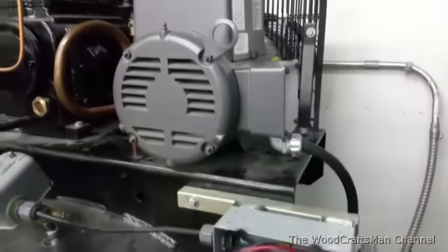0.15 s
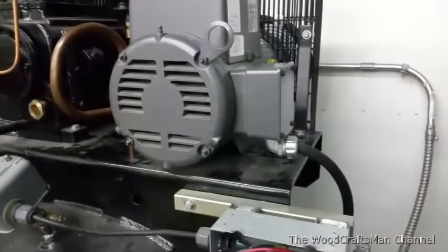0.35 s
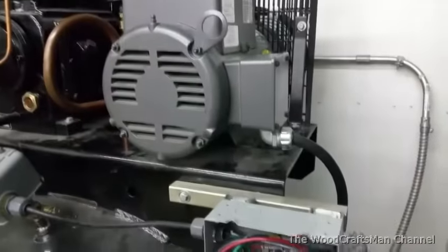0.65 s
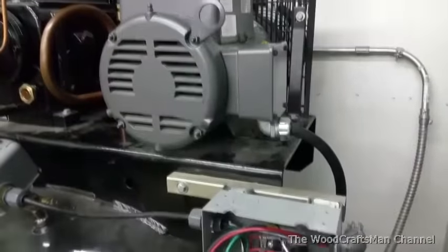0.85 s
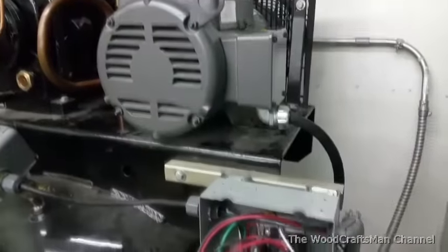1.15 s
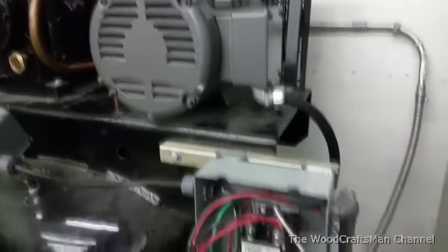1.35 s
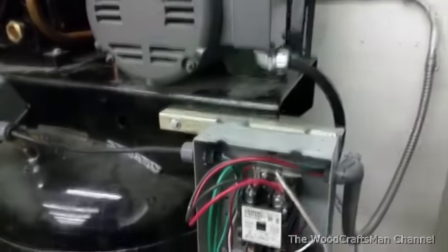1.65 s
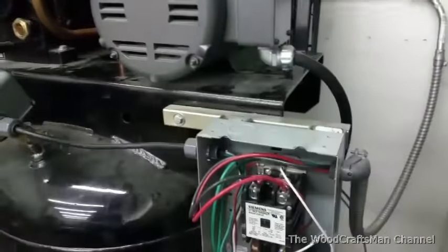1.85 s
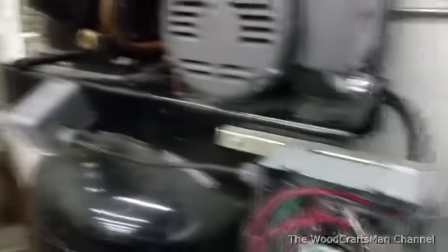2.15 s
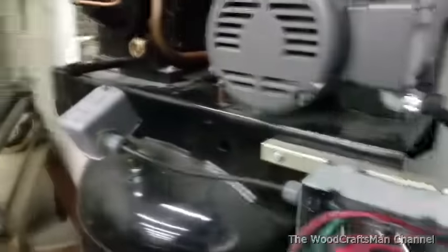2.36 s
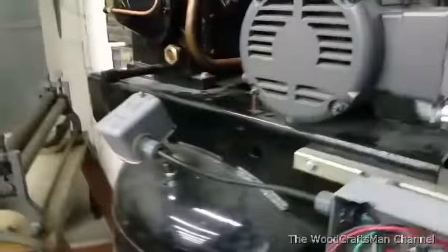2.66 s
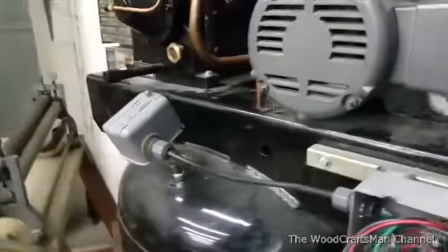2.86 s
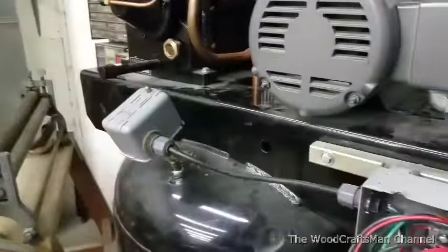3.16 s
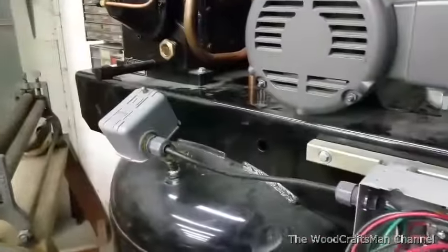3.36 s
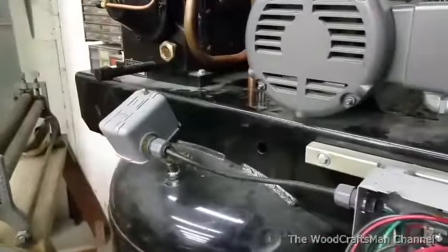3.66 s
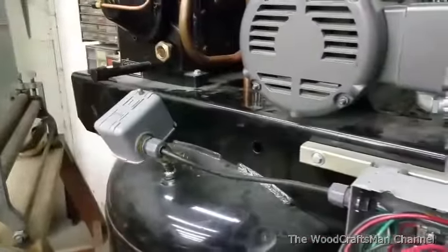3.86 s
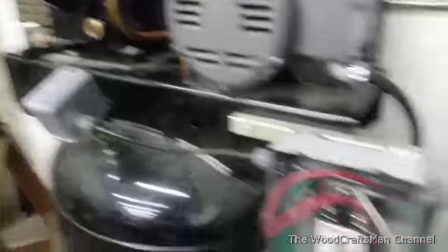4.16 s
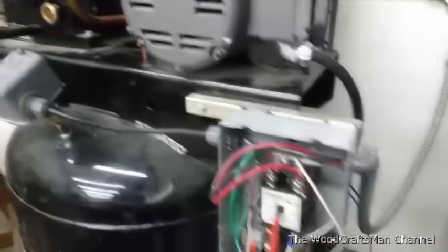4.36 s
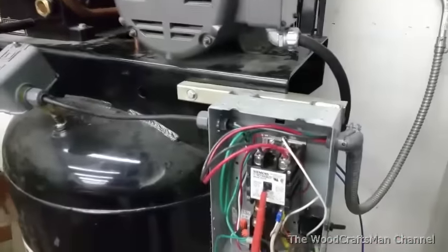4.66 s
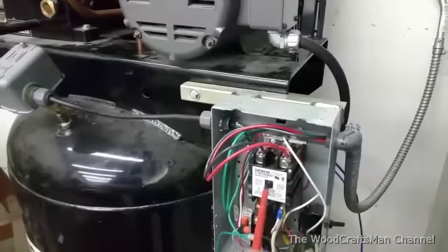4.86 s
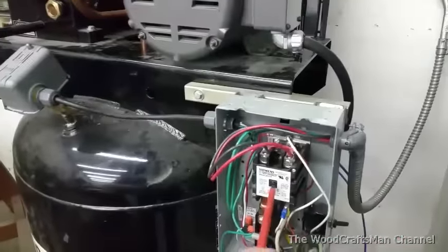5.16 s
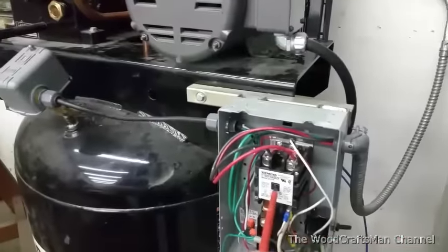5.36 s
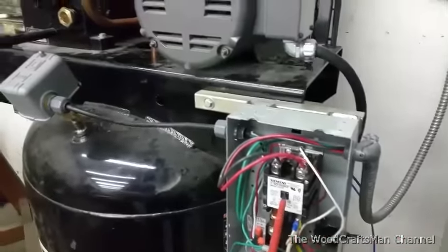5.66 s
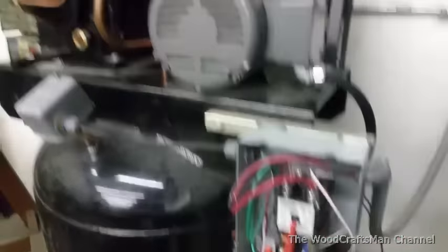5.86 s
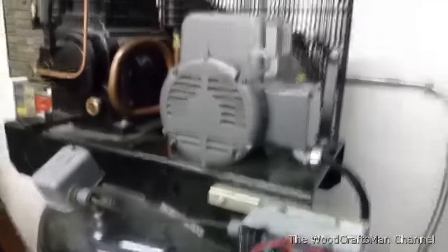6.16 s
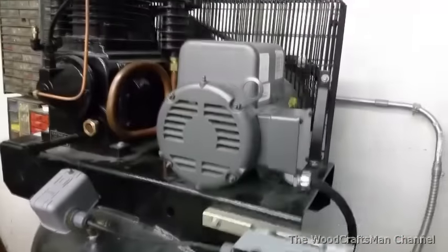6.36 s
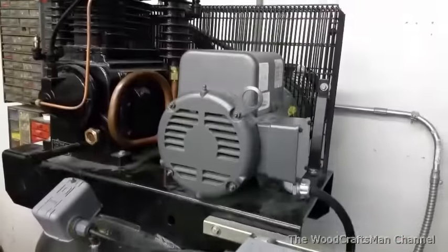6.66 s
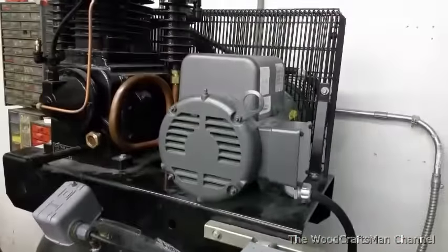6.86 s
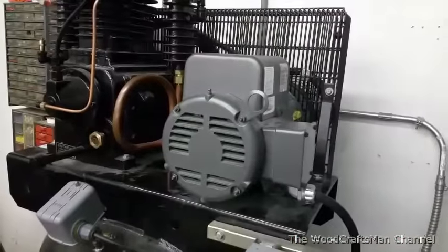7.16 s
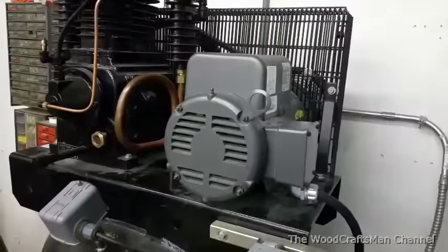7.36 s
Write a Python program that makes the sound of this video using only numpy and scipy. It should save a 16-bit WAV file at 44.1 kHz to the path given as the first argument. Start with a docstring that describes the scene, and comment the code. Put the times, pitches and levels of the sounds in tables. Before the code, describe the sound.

Sharp, shifting hiss of escaping compressed air, a faint rasp and taps, then a sudden clunking motor start accelerating into rapid chugging.

```python
"""Air leaks from a compressor fitting in a small workshop: hissing noise, combed by echoes off the machine.
It is heard by a hand-held pair of microphones that wanders about. Dull knocks, panel tones with a noisy
room tail, die away at the start; a grainy rasp, a few taps, a low drone and faint hum join in.
Near the end the motor is switched on and shudders up to speed, as rattling noise and ringing notes;
the pump thumps with short puffs, its valves tick with ringing chatter, and a rotor whine climbs."""
import sys
import numpy as np
from scipy import signal
from scipy.fft import rfft, irfft
from scipy.io import wavfile
from scipy.ndimage import uniform_filter1d, map_coordinates

SR = 44100
rng = np.random.default_rng(int(sys.argv[2]) if len(sys.argv) > 2 else 0)


def persist_wave(psi):
    """Save psi, clipped to +-1, as 16-bit WAV."""
    counts = np.round(np.clip(psi, -1, 1) * 32767).astype(np.int16)
    wavfile.write(sys.argv[1], SR, np.atleast_2d(counts).T)


N = 331191
T = np.arange(N) / SR  # time of each sample, s
HZ = np.fft.rfftfreq(1024, 1 / SR)[:, None]  # pitches of the short-time spectra
FRAMES = np.arange(N // 256 + 5) * 256 / SR  # times of the short-time spectra, s


def amp(db):
    """Turn decibels into a plain factor."""
    return 10 ** (np.asarray(db) / 20)


def evened(x):
    """Scale a signal to an rms of 1."""
    return x / np.sqrt(np.mean(abs(x) ** 2) + 1e-20)


def read(points, hz, order=1):
    """Read one column of a spectrum on a log-frequency axis."""
    rows = np.transpose(points)
    return np.interp(np.log(hz + 1), np.log(rows[0] + 1), rows[order])


def follow(rows, t):
    """Read every column of a curve at the times t."""
    s, *columns = np.transpose(rows)
    return [np.interp(t, s, c) for c in columns]


def hump(hz, width):
    """Gain of a resonance: highest at hz, falling on both sides."""
    return 1 / (1 + ((HZ - hz) / (width / 2)) ** 2)


def step(hz, width):
    """Gain that climbs smoothly from 0 below hz to 1 above it."""
    return .5 + .5 * np.tanh((HZ - hz) / width)


def drift(count, *sizes):
    """Random curve of rms 1, made slower by a running mean of each size."""
    x = rng.standard_normal(count)
    for size in sizes:
        x = uniform_filter1d(x, size=size)
    return evened(x)


def ring(t, hz, db, t60):
    """A struck note: a sine that falls by 60 dB in t60 seconds."""
    return amp(db - 60 * t / t60) * np.sin(2 * np.pi * hz * t)


def add(mix, s, sound):
    """Add a sound into the mix at time s, cut off at the end."""
    part = mix[..., round(s * SR):][..., :sound.shape[-1]]
    part += sound[..., :part.shape[-1]]


# How alike diffuse sound is at the two microphones: (frequency [Hz], likeness [-1 to 1])
LIKENESS = [(60, 1), (180, 0.98), (550, 0.64), (1650, -0.28), (4970, -0.02), (15000, 0.04)]


def noise(gains, same=None, turn=0):
    """Two partly alike noises from short-time spectra; gains is (2, bins, frames or 1)."""
    a, b, c, d = rng.standard_normal((len(FRAMES), len(HZ), 4)).T
    same = np.clip(read(LIKENESS, HZ) if same is None else same, 0, 1)
    left = a + 1j * b
    right = (same * left + np.sqrt(1 - same ** 2) * (c + 1j * d)) * np.exp(1j * turn)
    return signal.istft(gains * np.array([left, right]), nperseg=1024, noverlap=768)[1][:, :N]


# Colour difference of the two microphones: (frequency [Hz], left minus right [dB])
MICROPHONES = [(60, -4), (130, 1), (290, -2.5), (640, 1.5), (1410, 4), (3100, 2.5), (6820, 1.5),
               (15000, 13.5)]


def ported(gain):
    """Give a sound the colour difference of the two microphones."""
    half = amp(read(MICROPHONES, HZ) / 2)
    return np.array([gain * half, gain / half])


def narrow(hz, width, steady=0.54):
    """Noise sent twice through a sharp resonance, its swells partly evened; width is in Hz."""
    a, b = rng.standard_normal((N, 2)).T
    same = np.clip(read(LIKENESS, hz), 0, 1)
    x = np.array([a, same * a + np.sqrt(1 - same ** 2) * b])
    pole = np.exp((2j * hz - width) * np.pi / SR)
    tone = evened(signal.lfilter([1], [1, -2 * pole, pole ** 2], x))
    tone = tone.real / (abs(tone) + 0.51) ** np.clip(steady, 0, 1)
    return evened(tone) * amp(read(MICROPHONES, hz) / 2 * np.array([[1], [-1]]))


# The leak as the microphones move, levels relative:
# (time [s], level [dB], lift of the hiss under 7 kHz [dB])
LEAK_PATH = [(0.3, -28, 5.5), (0.62, -28.5, 2.5), (1.37, -22.5, 3), (1.9, -21.5, 2.5), (2.2, -23, 1.5),
             (2.6, -24, 4), (2.85, -23, 8.5), (3.1, -23.5, 4), (3.75, -26, 4.5), (4.2, -25.5, 2.5),
             (4.45, -24.5, 0.5), (5.15, -27.5, 0.5), (5.25, -28.5, 1), (5.9, -29.5, 1), (6.57, -29.5, 1)]
# Colour of the air jet at each microphone: (frequency [Hz], left [dB], right [dB])
JET_COLOUR = [(496, -18.5, -19), (900, -20, -21.5), (1505, -12, -18), (2010, -9, -12.5), (3730, -6.5, -9),
              (3830, -7.5, -10.5), (5560, -15.5, -15), (5560, -10.5, -11.5), (7140, -1, -6), (8080, 2.5, 0),
              (9150, 2, -3.5), (9650, 6, -7.5), (12100, 4, -10.5), (13800, 6.5, -10), (15700, 2.5, -26)]
# Where the holder stands; the machine shadows a band of the hiss:
# (time of arrival [s], top of shadow [Hz], shadow left [dB], shadow right [dB],
# bright fringe near the shadow's top [dB], ridge near 8 kHz [dB], fill of the 5 kHz dip [dB],
# lift near 1.6 kHz [dB], delay of the right microphone [ms])
STANDING_PLACES = [(0, 9990, -4, 7.5, 3, -0.5, 2, 2, 0.28), (1.6, 12040, -5, 2.5, 3.5, -1.5, 0.5, 1, 0.28),
                   (2.4, 11180, -3.5, 0.5, 3, -5, 3, -1, .12),
                   (4.4, 11870, -10.5, -3.5, 1.5, 1, 1.5, 3.5, 0.2307),
                   (6.2, 11630, -9.5, 0, 0, 3, -0.5, 9, 0.18)]
# Hollows of the machine colour the jet: (frequency [Hz], width [Hz], then level at each place [dB])
MACHINE_HOLLOWS = [(1085, 90, -5, 1, -5.5, -5, -11), (1375, 63, 4.5, 1.5, 7, 6.5, 1.5),
                   (1720, 180, 4.5, 5, 0, 2, -2)]
MOVE_S, SLIDE = 0.29, 0.248  # length of a move; how far the ridges follow the shadow's top
SWITCH_ON_S = 6.608  # the motor's contacts close
DUCK_DB, DUCK_S = -5.5, 0.49  # the recorder turns the hiss down by this much once the motor runs, in this time


def leak():
    """Jet noise; echoes off the machine comb it into fine ridges that hold while the holder stands still."""
    level_db, lower_db = follow(LEAK_PATH, FRAMES)
    arrive, *columns = np.transpose(STANDING_PLACES)
    top_hz = columns[0]
    place = sum(np.clip((FRAMES - s) / MOVE_S + 1, 0, 1) for s in arrive[1:])
    blend = np.clip(1 - abs(place - np.arange(len(arrive))[:, None]), 0, 1)
    settings = np.array(columns) @ blend
    edge_hz, left_db, right_db, rim_db, ridge_db, fill_db, lift_db, delay_ms = settings

    # each place has its own random ridges; the hand sways, so the ridges slide
    ridges = uniform_filter1d(rng.standard_normal((len(arrive), len(HZ), 4)).T, size=3, axis=1)
    ridges += 0.6 * uniform_filter1d(ridges, size=9, axis=1)
    fields = evened(ridges) @ (blend / np.linalg.norm(blend, axis=0))
    sway = 1.76 * drift(len(FRAMES), 120, 120)
    slid = np.arange(len(HZ))[:, None] * (1 + sway / 300) * (edge_hz.mean() / edge_hz) ** SLIDE
    spots = [slid, np.arange(len(FRAMES)) + 0 * slid]
    left, right, alike, turn = (map_coordinates(f, spots, order=1, mode="nearest") for f in fields)
    depth_db = .8 * step(1500, 800) + 1.1 * step(7000, 3000)  # short waves are combed deeper

    patches = uniform_filter1d(rng.standard_normal((len(FRAMES), len(HZ))).T, size=12, axis=0)
    patches = evened(uniform_filter1d(patches, size=16, axis=1))
    flicker = drift(len(FRAMES), 3)

    lower = lower_db * (1 - step(7050, 410)) + fill_db * hump(5150, 1800) + lift_db * hump(1460, 2100)
    hollows = sum((np.array(db) @ blend) * hump(hz, width) for hz, width, *db in MACHINE_HOLLOWS)
    duck = DUCK_DB * np.clip((FRAMES - SWITCH_ON_S) / DUCK_S, 0, 1)
    shared = level_db + duck + lower + ridge_db * hump(7780, 400) + hollows
    shared = shared + 1.3 * patches + .5 * flicker

    left_shadow = left_db * (step(8250, 280) * (1 - step(top_hz, 200)) @ blend)
    right_shadow = right_db * step(9070, 300) * (1 - step(13000, 1500))
    rim = rim_db * (hump(top_hz + 350, 460) @ blend)
    colour = np.array([read(JET_COLOUR, HZ) + left_shadow + rim + depth_db * left,
                       read(JET_COLOUR, HZ, order=2) + right_shadow + depth_db * right])
    gains = amp(-20.0) * amp(colour + shared) * step(504, 150) * step(200, 60)
    lag = 2 * np.pi * HZ * delay_ms / 1000  # the sound reaches the right microphone a little later
    turn = 1.7 * turn * step(3950, 1500) * (1 - hump(7540, 1200))
    return noise(gains, 0.57 + 2.8 * alike, turn - lag)


# Colours of the motor's rattle and of its belt and fan rush: (frequency [Hz], level [dB])
RATTLE_COLOUR = [(18, -52), (30, -30), (93, -16), (125, 1.5), (152, -7), (191, -18), (312, -2), (553, -4),
                 (684, -4), (903, -12), (1500, -20), (1950, -43), (3300, -120)]
RUSH_COLOUR = [(530, -32), (900, -2.5), (1260, -2), (1380, -6.5), (1970, -4), (2260, -5), (3260, -6),
               (5010, -19.5), (5750, -19.5), (8030, -17.5), (8830, -16), (10500, -19), (11000, -14.5),
               (14300, -42), (22000, -120)]
# Frame and tank notes that the rattle feeds, levels relative:
# (frequency [Hz], width [Hz], level [dB], time of strongest ringing [s], length of swell [s])
FRAME_NOTES = [(372, 40, -18, 6.625, 0.024), (363, 52, -22, 6.68, 0.15), (305.5, 33, -19.5, 6.76, 0.092),
               (255, 52, -26, 6.74, 0.053), (2334, 38, -32, 6.77, 0.04), (635, 27, -26, 6.855, .016),
               (428.7, 9.8, -26.5, 6.78, 0.053), (624, 10, -23, 6.93, 0.075), (495, 9, -25, 6.95, 0.055),
               (840, 12, -33, 7.1, 0.25), (495, 10, -32, 7.33, .15), (810, 8.9, -34, 7.19, 0.25),
               (1070, 24, -23, 6.98, 0.021), (1087, 10, -37, 7.7, 0.26), (1360, 18, -34, 6.98, 0.2),
               (1520, 150, -28.5, 7.25, 0.18), (752, 14, -33, 7.1, 0.1), (54.4, 14, -26, 6.7, 0.06),
               (121, 73, -34, 7.4, 0.27)]
BITE_S, SWELL_S, FIRST_DB = .006, .04, -7  # the rattle bites at once, this far down, then swells
RATTLE_DB, SETTLE_DB_PER_S = -20, -5  # level before the changes below; slow settling
RUSH_DB, RUSH_PEAK_S, RUSH_FALL_DB_PER_S = -21, 7.06, -7.5  # strongest as full speed is reached
TURN_SAG_DB, SHUDDER_DB = -1.5, -5  # sinking over each turn; holding back just before each main stroke
DIP_S, DIP_WIDTH_S, DIP_DB = 7.082, 0.014, -10  # brief drop as the starting switch throws
GRIT_DB = -0.5  # the rush comes in coarse grains


def motor():
    """Rattle and rush swell at the switch-on; frame notes swell and fade, each at its own time."""
    since = np.maximum(T - SWITCH_ON_S, 0)
    on = np.clip(since / BITE_S, 0, 1)
    bite_db = FIRST_DB * np.exp(-since / SWELL_S)
    turn = np.interp(T, np.transpose(CRANK_TURNS)[0], np.arange(len(CRANK_TURNS))) % 1
    sag_db = TURN_SAG_DB * turn ** 2
    dip_db = DIP_DB * np.exp(-.5 * ((T - DIP_S) / DIP_WIDTH_S) ** 2)
    rattle_db = RATTLE_DB + bite_db + SETTLE_DB_PER_S * since + sag_db + SHUDDER_DB * turn ** 6 + dip_db
    rush_db = RUSH_DB + bite_db + RUSH_FALL_DB_PER_S * abs(T - RUSH_PEAK_S) + 1.2 * sag_db + .5 * dip_db
    frame_db = bite_db + dip_db + .5 * TURN_SAG_DB * turn
    shake = amp(1.7 * drift(N, 500))
    grit_db = GRIT_DB * drift(N, 120)
    rattle, rush = (evened(noise(ported(amp(read(c, HZ)) * (HZ < c[-1][0]))))
                    for c in (RATTLE_COLOUR, RUSH_COLOUR))
    frame = 0
    for hz, width, db, s, swell in FRAME_NOTES:
        frame = frame + amp(db) * narrow(hz, width, steady=0.39) * np.exp(-.5 * ((T - s) / swell) ** 2)
    noises = amp(rattle_db) * rattle + amp(rush_db + grit_db) * rush
    return on * (shake * noises + amp(frame_db) * shake ** .5 * frame)


# Turns of the crank, levels relative: (time of the main stroke [s], its level [dB],
# time of the second piston [s], its level [dB], reed snap [dB])
CRANK_TURNS = [(6.74, -19, 6.817, -12, -40), (6.886, -3.5, 6.952, -12, -11), (7.017, -5, 7.057, -5.5, -17),
               (7.109, -4.5, 7.141, -11.5, -10.5), (7.19, -4, 7.222, -9, -10),
               (7.265, -4, 7.297, -12, -10.5), (7.34, -5, 7.372, -18, -13), (7.416, -6.5, 7.447, -22, -14),
               (7.49, -5.5, 9.1, -34, -15)]
# Notes of the cylinder head: (frequency [Hz], level [dB], time to fall 60 dB [s])
HEAD_NOTES = [(1373, 1.5, 0.071), (1530, -2.5, 0.047), (810, -5, 0.033), (2310, -8, 0.04),
              (3030, -13, 0.03)]
PUFF_HZ, SECOND_HZ, PUFF_SPREAD = 272, 296, 0.02  # intake notes of the two pistons, relative scatter
LAG_S, RISE_S = .0016, .0033  # the puff leaves just after the valve opens; time to its peak
HEAD_DB = -10.5  # head ring against the stroke


def pump():
    """Each stroke sends a short swelling puff out of the intake and rings the cylinder head."""
    puffs, head, t = np.zeros(N), np.zeros(N), T[:3000]
    start, main_db, second, second_db, _ = np.transpose(CRANK_TURNS)
    strokes = np.transpose([np.append(start, second), np.append(main_db, second_db)])
    spread = rng.standard_normal((len(strokes), len(HEAD_NOTES), 2))
    scatter = 1 + PUFF_SPREAD * rng.standard_normal(len(strokes))
    notes_hz = np.repeat([PUFF_HZ, SECOND_HZ], len(CRANK_TURNS)) * scatter
    swell = (t / RISE_S * np.exp(1 - t / RISE_S)) ** 1.5
    for (s, db), puff_hz, chance in zip(strokes, notes_hz, spread):
        add(puffs, s + LAG_S, -amp(db) * swell * np.sin(2 * np.pi * puff_hz * t))
        clang = sum(ring(t, hz * (1 + 0.013 * j), d + 1.2 * k, t60)
                    for (hz, d, t60), (k, j) in zip(HEAD_NOTES, chance))
        add(head, s + 0.00202, amp(db + HEAD_DB) * clang * (1 - np.exp(-t / 0.004)))
    return puffs * amp([[-1.1], [1.1]]) + head * amp([[2.5], [-2.5]])


SNAP_AT, BEND = .73, 0.13  # place of the snap in the turn; it comes later while the crank speeds up


def crank(place):
    """Times at which each turn reaches a place between 0 and 1."""
    start = np.transpose(CRANK_TURNS)[0]
    length = np.diff(start)
    length = np.append(length, [length[-1], length[-1]])
    return start + length[:-1] * (place + BEND * (1 - length[1:] / length[:-1]))


# Clicks of the starting switch, levels relative: (time [s], level [dB], weight of the lower notes [dB])
SWITCH_CLICKS = [(6.6977, -13, -22), (6.754, -15, -16), (7.0897, 1, -12), (7.1064, -9, -8),
                 (7.1254, -15, -6), (7.2234, -15, -20)]
# High and low notes of a tick: (frequency [Hz], level [dB], time to fall 60 dB [s])
HIGH_NOTES = [(8200, -6, .025), (9500, -4, .02), (10400, -3, .018), (11400, -2, .006), (12400, -2, .006),
              (13800, -2, .006), (15000, -2, .005)]
LOW_NOTES = [(1850, 7, 0.012), (4950, 2, 0.035), (5180, 1, 0.025)]
OPEN_LAG_S, OPEN_DB = 0.0022, -19  # a lighter tick follows each main stroke; level against the stroke
REED_LOW_DB = -33  # weight of the lower notes in a reed tick
REED_HZ, REED_DB, REED_T60_S = 10400, -19, .03  # the intake reed sings; level against the stroke
CHATTER_S, SNAP_PER_LOW = .0011, 9  # chatter dies this fast; heavier parts snap harder


def ticks():
    """Steel reeds and the switch snap open or shut: a few milliseconds of chatter ring short notes."""
    out, t = np.zeros((2, N)), T[:2500]
    start, main_db, *_, snap_db = np.transpose(CRANK_TURNS)
    reeds = zip(np.append(start + OPEN_LAG_S, crank(SNAP_AT)), np.append(main_db + OPEN_DB, snap_db))
    rows = SWITCH_CLICKS + [(s, db, REED_LOW_DB) for s, db in reeds if s < N / SR]
    chance = rng.standard_normal((len(rows), 2, 140))
    spread = rng.standard_normal((len(rows), len(HIGH_NOTES)))
    fade = t[:140] * np.exp(-t[:140] / CHATTER_S)
    for (s, db, low_db), chatter, tilt in zip(rows, chance, spread):
        high = sum(amp(2.5 * k) * ring(t, *note) for k, note in zip(tilt, HIGH_NOTES))
        high[0] = 2 + SNAP_PER_LOW * amp(low_db)  # the bare snap before the ring
        tick = signal.fftconvolve(chatter * fade, high[None], axes=1)[:, :len(t)]
        low = amp(low_db) * (1 - np.exp(-t / 0.005)) * sum(ring(t, *note) for note in LOW_NOTES)
        add(out, s, amp(db) * (tick / abs(tick).max(axis=1, keepdims=True) + low))
    song = (1 - np.exp(-t / 0.00048)) * ring(t, REED_HZ, REED_DB, REED_T60_S)
    for s, db in zip(start, main_db):
        add(out, s + OPEN_LAG_S, amp(db) * song)
    hz = np.fft.rfftfreq(N, 1 / SR)
    out[1] = irfft(rfft(out[1]) / amp(read(MICROPHONES, hz)), N)  # the right microphone is duller
    return out


# Rotor whine rising with the speed, levels relative: (time [s], frequency [Hz], level [dB])
WHINE_PATH = [(6.62, 200, -40), (6.85, 640, -36), (6.96, 1050, -34), (7.06, 1540, -33), (7.1, 1620, -45)]
# Bands of the whine: (multiple of its frequency, level [dB])
WHINE_BANDS = [(0.501, -1), (1.001, 2.5), (1.25, -6)]
WHINE_WIDTH_HZ, WHINE_LUMP_DB = 90, 3.5  # blur of each band; random unevenness


def whine():
    """Blurred, lumpy bands that climb while the rotor gathers speed."""
    hz, db = follow(WHINE_PATH, T)
    cycles = np.cumsum(hz) / SR
    r, out = np.exp(-np.pi * WHINE_WIDTH_HZ / SR), 0
    for multiple, band_db in WHINE_BANDS:
        a, b = rng.standard_normal((N, 2)).T
        fuzz = evened(signal.lfilter([1], [1, -2 * r, r ** 2], a + 1j * b))
        band = np.sqrt(2) * (fuzz * np.exp(2j * np.pi * multiple * cycles)).real
        out = out + amp(band_db + WHINE_LUMP_DB * drift(N, 900)) * band
    return amp(db) * out * (T > SWITCH_ON_S) * (T < WHINE_PATH[-1][0])


# Dull knocks, levels relative: (time [s], level in the room [dB], level of the direct thud [dB])
KNOCK_TIMES = [(0.001, -23, -22), (0.2203, -27, -6), (0.2408, -28, -4), (.2548, -36, -9), (.2625, -40, -10),
               (.2715, -34, -6), (.2915, -42, -14), (.313, -42, -13), (.331, -44, -14), (.351, -42, -14),
               (.375, -46, -19), (.453, -52, -25), (.485, -54, -26)]
# Colour of the knocks in the room: (frequency [Hz], level [dB per Hz])
KNOCK_ROOM_COLOUR = [(24, -70), (40, -46), (97, -14), (193, -20), (250, 0), (348, -5.5), (406, -19),
                     (626, -8.5), (671, 6), (1930, -8), (2500, -18), (3250, -59), (5500, -120)]
# Notes of the struck panel itself: (frequency [Hz], level [dB], time to fall 60 dB [s])
PANEL_NOTES = [(288, 0, .045), (118, -15, .15), (510, -15, .03), (920, -17, .02), (1450, -19, .015),
               (2200, -24, .01)]
# Room notes that linger: (frequency [Hz], width [Hz], level [dB], time to fall 60 dB [s])
ROOM_NOTES = [(290.3, 10, -14, 1.25), (335, 16, -11, 0.5), (254, 40, -11, 0.3), (107, 23, -9, 0.45),
              (506, 40, -18, .15)]


def knocks():
    """A struck panel, plus low room noise whose top dies first; a few room notes linger."""
    t, blow, direct = T[:SR], np.zeros(N), np.zeros(N)
    body = -sum(ring(t, *note) * (1 - np.exp(-t * note[0] / .85)) for note in PANEL_NOTES)
    for s, db, direct_db in KNOCK_TIMES:
        blow[round(s * SR)] = amp(db)
        add(direct, s, amp(direct_db) * body)

    def dying(t60):
        """Loudness curve: each blow rises fast and falls 60 dB in t60 seconds."""
        return signal.oaconvolve(blow, amp(-60 * t / t60) * (1 - np.exp(-t / 0.00085)))[:N]

    colour = amp(read(KNOCK_ROOM_COLOUR, HZ)) * (HZ > 70)
    boom, slap = (evened(noise(ported(colour * part))) for part in (HZ < 600, HZ >= 600))
    thud = amp(2.0) * dying(0.4) * boom + amp(-6.5) * dying(0.25) * slap
    linger = sum(amp(db) * dying(t60) * narrow(hz, width, steady=0.29) for hz, width, db, t60 in ROOM_NOTES)
    return thud + direct + linger


# A dry rasp, levels relative: (time [s], level of its core [dB], level of its wide skirt [dB])
RASP_PATH = [(2.55, -37, -48), (2.65, -32.5, -41), (2.74, -30, -41), (2.88, -28.5, -27.5),
             (2.94, -28.5, -45), (3.03, -31, -38), (3.1, -33, -50), (3.43, -37.5, -56), (3.67, -30.5, -52),
             (3.78, -41, -54), (3.85, -47, -50)]
CORE_HZ, CORE_WIDTH_HZ = 2900, 900
SKIRT_HZ, SKIRT_WIDTH_HZ = 5600, 6000


def rasp():
    """Grainy noise with a narrow core and a wide skirt."""
    core_db, skirt_db = follow(RASP_PATH, T)
    on = np.interp(T, [RASP_PATH[i][0] for i in (0, 1, -2, -1)], [0, 1, 1, 0])
    grain = amp(0.5 * drift(N, 300) + 2.0 * drift(N, 1500))
    both = np.ones((2, 1, 1))
    core = evened(noise(hump(CORE_HZ, CORE_WIDTH_HZ) * both, 0.05))
    skirt = evened(noise(hump(SKIRT_HZ, SKIRT_WIDTH_HZ) * both, 0.05))
    return on * grain * (amp(core_db) * core + amp(skirt_db) * skirt)


# Taps on the microphone case, levels relative: (time [s], level [dB], time scale [s], left minus right [dB])
CASE_TAPS = [(1.484, -41, 0.0012, -1), (2.163, -55, .003, 0), (3.07, -47, 0.0018, 0),
             (3.477, -19.5, 0.00039, -26), (5.479, -34, 0.00057, -1)]


def taps():
    """A finger on the case: one push and its rebound."""
    out = np.zeros((2, N))
    for s, db, length, pan_db in CASE_TAPS:
        u = T[:2000] / length
        add(out, s, amp(db + np.array([[pan_db], [0]])) * 3 * u * (2 - u) * np.exp(-u))
    return out


WANDER_S = 0.092  # length of each of the two running means


def wander(t, step_s):
    """Slow chance of rms 1 at the times t."""
    size = max(round(WANDER_S / step_s), 1)
    return drift(len(t), size, size)


# Low drone of the shop, levels relative:
# (time [s], level [dB], lift of the bass [dB], level of its narrow note [dB])
DRONE_PATH = [(0.55, -43.5, 5, -72), (1.1, -54.5, 5, -80), (1.27, -43, -7, -64), (1.65, -43.5, 1, -64),
              (1.85, -49, 0.5, -59.5), (2.55, -48.5, -12, -58.5), (2.95, -57, -1, -51.5),
              (3.35, -48.5, -6, -51.5), (3.7, -63.5, 3, -63), (3.9, -49.5, 3, -52), (4.35, -44, -2, -45.5),
              (5.0, -45.5, 1, -48.5), (5.8, -50, 3, -47), (6.57, -46.5, 0.5, -51)]
# Colour of the drone: (frequency [Hz], level [dB per Hz])
DRONE_SPECTRUM = [(15, -59), (25, 4), (60, -28), (136, -8), (207, -16.5), (301, 1.5), (389, -8.5),
                  (479, -7.5), (565, -15.5), (900, -12), (1170, -14), (1500, -25), (1980, -120)]
NOTE_HZ, NOTE_WIDTH_HZ = 422, 14
WANDER_DB, BASS_WANDER_DB, NOTE_WANDER_DB = 2.06, 3.0, 1.0  # random wavering of level, bass and note


def drone():
    """Low rumble of the shop, shaped noise, with one narrow, fluttering note."""
    level_db, _, note_db = follow(DRONE_PATH, T)
    bass_db = follow(DRONE_PATH, FRAMES)[1] + BASS_WANDER_DB * wander(FRAMES, 256 / SR)
    colour_db = read(DRONE_SPECTRUM, HZ) + bass_db * (1 - step(190, 30))
    rumble = evened(noise(ported(amp(colour_db) * (HZ > 20))))
    note = narrow(NOTE_HZ, NOTE_WIDTH_HZ, steady=.7)
    rumble = amp(level_db + WANDER_DB * wander(T, 1 / SR)) * rumble
    return rumble + amp(note_db + NOTE_WANDER_DB * wander(T, 1 / SR)) * note


# Hum lines, most at multiples of 120 Hz: (frequency [Hz], level once risen [dB])
HUM_LINES = [(240, -60), (291, -59), (360, -63), (480, -62), (600, -66), (840, -66)]
MAINS_FROM_S, MAINS_RISE_S = 4.3, 0.98  # it grows as the holder nears the switch box


def mains():
    """Faint hum: sine waves that fade in and then hold steady."""
    rise = np.clip((T - MAINS_FROM_S) / MAINS_RISE_S, 0, 1)
    return rise * sum(amp(db) * np.sin(2 * np.pi * (hz * T + rng.random())) for hz, db in HUM_LINES)


# How long the shop rings: (frequency [Hz], time to fall 60 dB [s])
SHOP_DECAY = [(100, 0.28), (300, 0.65), (1000, 0.22), (4000, 0.6), (12000, 0.12)]


def shop(x):
    """Room echo: sparse taps of random sign, each band dying at its own speed."""
    echoes = np.zeros((2, SR // 2))
    slots = np.arange(300, SR // 2 - 20, 20)
    at = slots + rng.integers(0, 20, (2, len(slots)))
    np.put_along_axis(echoes, at, rng.choice([-1., 1.], at.shape), 1)
    hz, t, z = signal.stft(echoes, SR, nperseg=256)
    same = np.clip(read(LIKENESS, hz), 0, 1)[:, None]
    z[1] = same * z[0] + np.sqrt(1 - same ** 2) * z[1]
    tail = signal.istft(z * amp(-60 * t / read(SHOP_DECAY, hz)[:, None]), SR, nperseg=256)[1]
    return signal.fftconvolve(x, tail / np.linalg.norm(tail[0]), axes=1)[:, :N]


WET_DB = -13  # room echo of the pump, ticks and whine


def scene():
    """Mix all sources; the pump, ticks and whine also echo in the shop."""
    blows = pump() + ticks() + whine()
    machine = motor() + blows + amp(WET_DB) * shop(blows)
    return leak() + machine + knocks() + rasp() + taps() + drone() + mains()


EDGE_HZ = 15760  # top of the recorded band


def record(dry):
    """The microphones lose the deepest bass; then the full-scale ceiling and the band limit."""
    high_pass = signal.butter(2, 60, "high", fs=SR, output="sos")
    thin = np.clip(signal.sosfilt(high_pass, dry), -1, 1)
    low_pass = signal.firwin(1023, EDGE_HZ, window=("kaiser", 9), fs=SR)
    return signal.oaconvolve(thin, low_pass[None], "same")


dry = scene()
out = record(dry)
persist_wave(out)
```